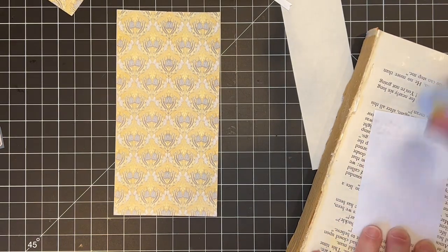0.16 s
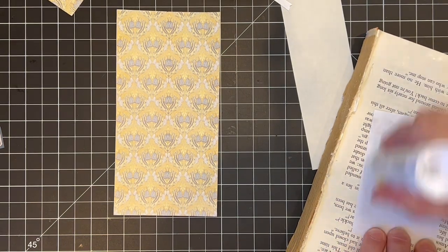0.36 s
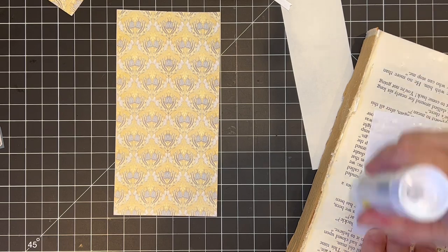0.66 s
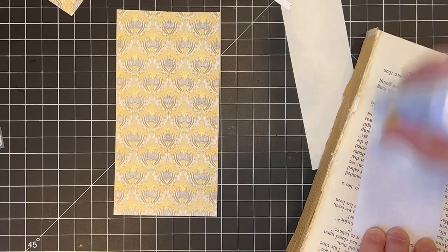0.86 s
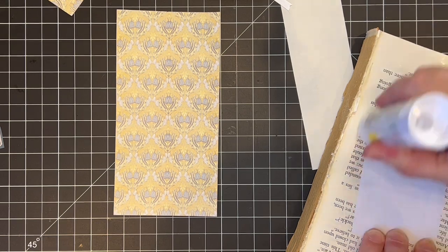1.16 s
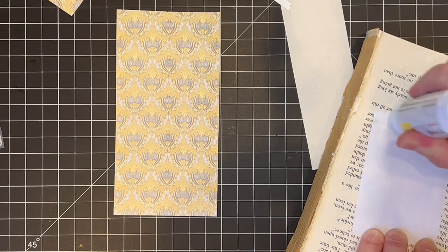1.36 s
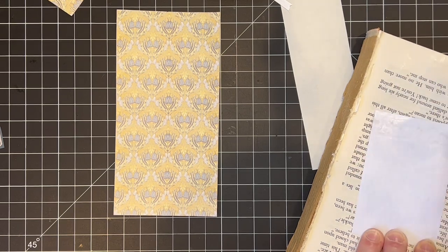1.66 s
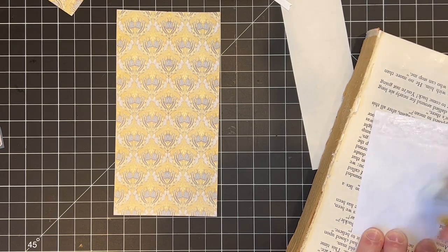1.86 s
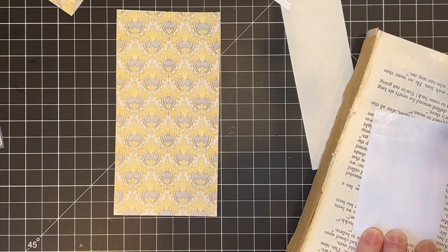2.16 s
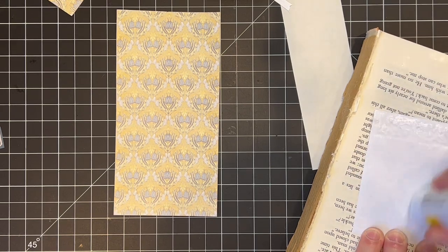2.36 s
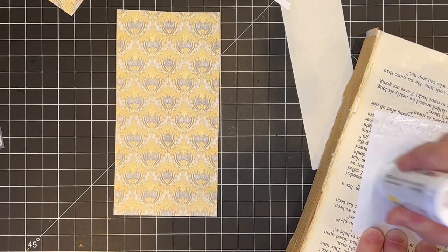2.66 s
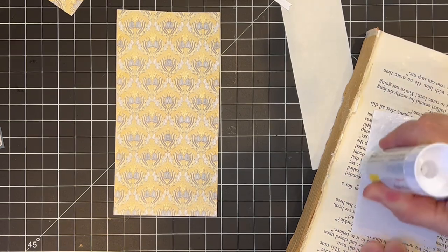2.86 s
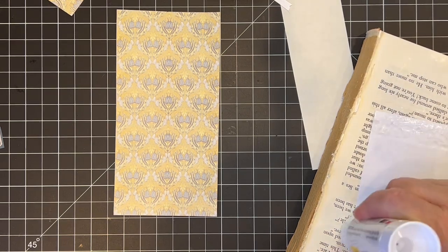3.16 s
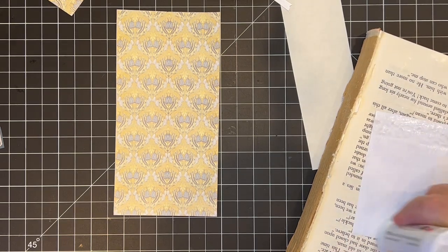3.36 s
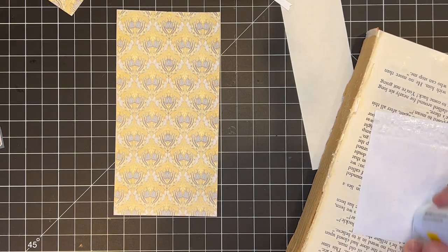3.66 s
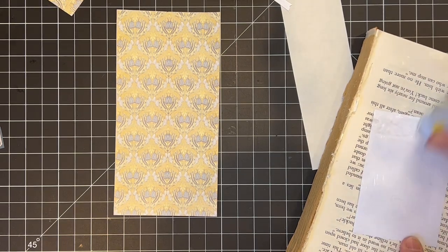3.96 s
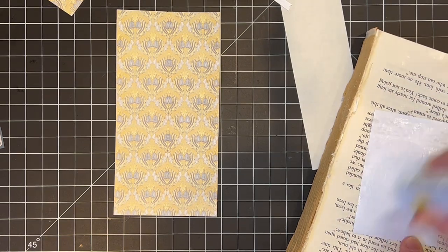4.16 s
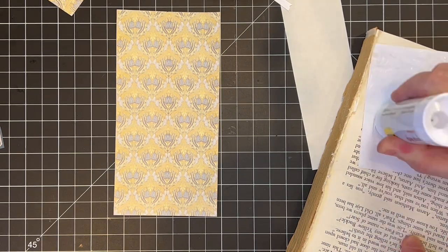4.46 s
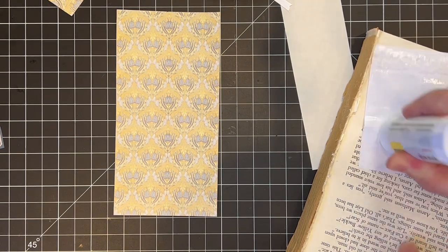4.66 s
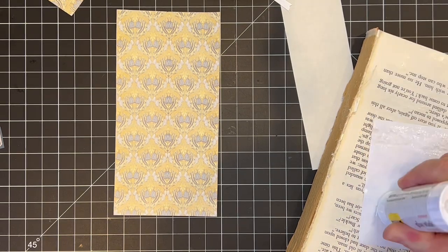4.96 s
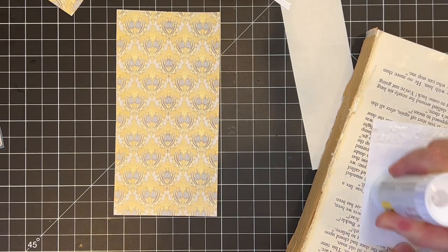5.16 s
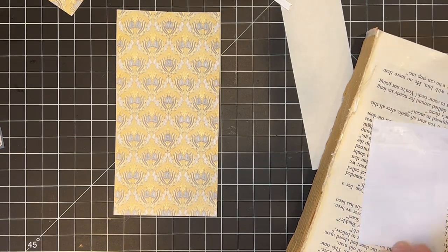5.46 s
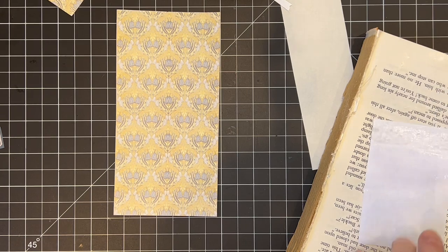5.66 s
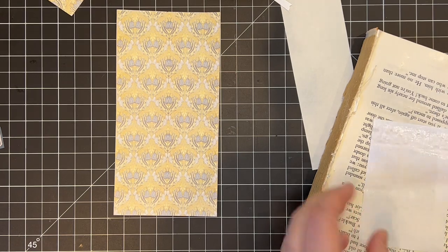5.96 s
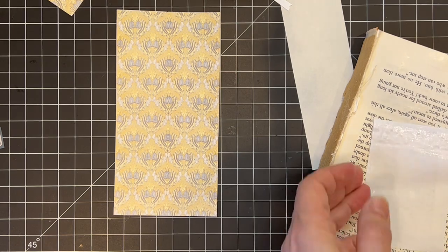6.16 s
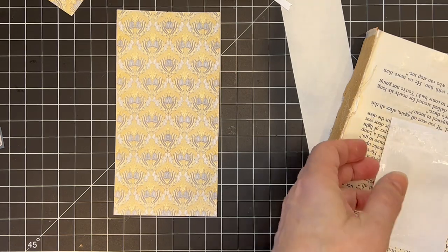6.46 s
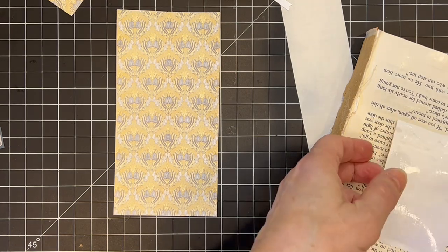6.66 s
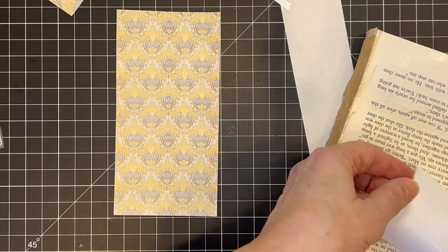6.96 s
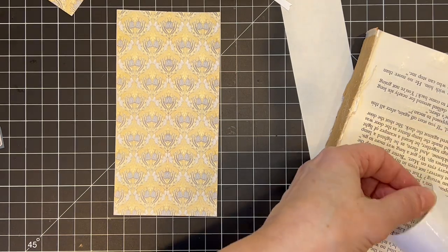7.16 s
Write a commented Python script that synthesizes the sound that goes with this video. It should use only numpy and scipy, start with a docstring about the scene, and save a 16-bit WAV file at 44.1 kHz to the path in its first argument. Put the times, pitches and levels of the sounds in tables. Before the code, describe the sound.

A small quiet room with faint hush and a low table murmur, heard very close through the table top. At 0 seconds a glue stick strikes paper on a book with a hard slap, hollow knock and plastic clack. More firm knocks follow at about 0.3, 0.6 and 1.0, the later two with sharp clicks just behind. From 1.3 to 2.3 the dabs are softer and sparser, with thin paper hiss; dull thuds return at 1.9, 2.3 and 2.7. Around 3 to 4 it is mostly faint ticks and light sliding. Between 4.25 and 4.9 come quick tacky snaps, dry scrapes and plastic clicks, then a low knock at 4.9. Smaller ticks continue until the stick is set down near 6.0 with a clear clack. Soft rustling follows as the sheet peels off, strongest near 6.8, fading to small ticks by 7.2.

```python
"""At a table in a small quiet room, a phone clamped to the same table top looks down on a sheet on an open book.
A glue stick is dabbed and dragged over it. Each dab is a set of table modes, delayed more the lower they are;
the barrel clacks as decaying sines, tacky glue and paper tick as noise bursts and hiss as grains over noise,
through the resonances of the sheet, which is peeled off at the end. The table murmurs as filtered noise,
the room answers with a diffuse tail and adds its hush, and left and right differ in phase."""
import sys
import numpy as np
from scipy import signal
from scipy.fft import rfft, irfft, next_fast_len
from scipy.io import wavfile
from scipy.ndimage import uniform_filter1d

SR = 44100
rng = np.random.default_rng(int(sys.argv[2]) if len(sys.argv) > 2 else 0)


def store_pcm(level_fs):
    """Save levels as 16-bit WAV."""
    pcm = np.round(np.clip(level_fs, -1, 1) * 32767).astype(np.int16)
    wavfile.write(sys.argv[1], SR, np.atleast_2d(pcm).T)


N = 322371

# Hush of the room. Each row: frequency in Hz, relative level per Hz in dB.
HUSH = [(15, -24), (25, -17.5), (53, 0.5), (85, -2.5), (324, -16), (527, -22), (706, -33), (1150, -34.5),
        (1580, -31), (2570, -41), (4290, -47), (7520, -44.5), (10000, -52.5), (12500, -36.5),
        (16000, -45.5)]
HUSH_DB = -65.5  # rms of the whole hush
# Murmur of the table. Each row: time in seconds, level at 40-140 Hz in dB, level at 140-700 Hz in dB.
MURMUR = [(0.0, -58.5, -67.5), (0.35, -60.5, -64.5), (0.51, -59.5, -67), (1.0, -52.5, -69),
          (1.81, -63.5, -74), (2.58, -56.5, -65), (3.48, -64, -70), (4.78, -62.5, -68.5),
          (4.95, -52.5, -74), (5.29, -59.5, -74.5), (6.29, -60, -63.5), (7.15, -70.5, -74),
          (7.31, -70.5, -72)]
# Modes of the table top. Each row: frequency in Hz, relative level in dB, 60 dB decay in seconds.
TABLE_MODES = [(63.85, 5.5, 1), (89, 2, 0.25), (103.6, -0.5, 0.1), (128, -11.5, 0.21), (178.9, -2, 0.27),
               (236.8, -3, 0.077), (314.8, -8.5, 0.098), (362, -10.5, 0.44), (438, -15.5, 0.32),
               (480, -20, 0.28), (528.7, -18, 0.22), (615, -24, 0.23), (750, -27, 0.12), (929, -30, 0.28)]
# Stick landing on the book, and at about 6 s set down on the table. Each row: start in seconds,
# slap peak (600-1300 Hz) in dB, knock peak in dB, knock frequency in Hz,
# body peak (130-260 Hz) in dB, thump peak (50-130 Hz) in dB.
DABS = [(0.019, -26, -19.5, 330, -35.5, -33.5), (0.289, -36.5, -18.5, 287, -22.5, -25),
        (0.475, -48, -37.5, 338, -45.5, -51), (0.622, -33, -14.5, 415, -21, -24),
        (0.987, -30.5, -15.5, 418, -21.5, -26), (1.292, -55.5, -51, 463, -54.5, -47.5),
        (1.667, -58, -51.5, 308, -38.5, -44), (1.922, -54, -29, 420, -32, -29),
        (2.093, -67, -50, 328, -56, -44.5), (2.336, -34, -35, 345, -20, -23.5),
        (2.682, -46, -31, 307, -29, -33.5), (2.849, -43.5, -41.5, 304, -39, -39.5),
        (3.096, -52, -47.5, 350, -48, -49), (3.991, -73, -48, 366, -51, -57.5),
        (4.253, -35, -26, 390, -51.5, -32), (4.388, -53, -43.5, 310, -58, -52.5),
        (4.44, -47, -42, 370, -52, -48.5), (4.669, -53.5, -40.5, 404, -43, -47),
        (4.689, -44, -37, 550, -46, -48.5), (4.938, -53, -29, 408, -27.5, -29.5),
        (5.374, -57, -42, 330, -58, -53), (5.56, -56, -49, 354, -47, -47), (6.017, -59, -44, 320, -34, -52),
        (6.03, -59, -44, 400, -38, -44), (6.14, -62, -44.5, 377, -47, -60)]
# Glue letting go, paper snapping. Each row: time in seconds, peak at 1.3-4 kHz in dB,
# brightness (9-16 kHz over that) in dB.
TICKS = [(0.0202, -17, -10.5), (0.29, -33.5, -4), (0.314, -48, -19), (0.332, -74, 30), (0.4138, -63.5, 18),
         (0.435, -59, 13.5), (0.624, -38, -9), (0.638, -59, 11), (0.653, -26.5, -10.5), (0.732, -57, 21.5),
         (0.7681, -65, 8), (0.9892, -52, 0), (1, -47.5, 8.5), (1.0208, -25, -5.5), (1.1683, -55.5, 13.5),
         (1.2943, -45.5, -6), (1.3285, -76, 28), (1.388, -67.5, 12), (1.4202, -57, 0.5),
         (1.4646, -72, 16.5), (1.6671, -44.5, 9.5), (1.9236, -40.5, -1.5), (1.947, -42.5, -15),
         (2.3387, -36.5, -11), (2.3755, -55, 10), (2.6804, -47, -8), (2.762, -78, 29), (2.801, -59.5, 12),
         (2.8294, -74, 15), (2.8468, -37.5, 0), (2.8672, -46, -1), (3.0976, -61.5, 10), (3.211, -65.5, 17),
         (3.245, -60, 19), (3.5039, -37.5, 3), (3.5822, -53.5, 0), (3.7037, -53, -3), (3.9342, -52.5, 8),
         (3.9673, -62, 22), (3.9812, -56, 4), (3.9945, -36.5, 12.5), (4.041, -43, -23), (4.05, -46.5, -23),
         (4.0655, -50, -12), (4.2444, -45.5, -17), (4.254, -37, -13), (4.3607, -39, -5), (4.385, -28, 3),
         (4.4034, -25, -23), (4.44, -31.5, 6), (4.5245, -58, 25.5), (4.65, -77, 22), (4.6591, -42.5, 16),
         (4.6667, -29.5, 7), (4.67, -36.5, 18), (4.6877, -37.5, -8), (4.785, -48, -22), (4.8272, -45.5, 10),
         (4.9404, -37, -7.5), (5.046, -60.5, -12), (5.3692, -62, 23.5), (5.3837, -54.5, 22.5),
         (5.4003, -54, 19), (5.4555, -58, 13), (5.5445, -67, 14), (5.602, -58, 10), (5.646, -56.5, -6),
         (5.9008, -58, 10), (5.9711, -44, -12), (6.018, -35.5, -1.5), (6.337, -43.5, 3.5),
         (6.998, -48, 4.5), (7.2346, -49, -16), (7.2407, -51.5, -12)]
# Resonances of the sheet. Each row: frequency in Hz, width in Hz, relative level in dB.
SHEET_MODES = [(1740, 1400, 2.5), (2636, 1200, 3.5), (3760, 1770, -11.5), (4463, 2700, -1),
               (7730, 1900, 3.5), (9600, 3600, -0.5), (12440, 4700, 3.5), (15200, 4800, 1)]
# the sheet in three registers: 1.3-4, 4-9 and 9-16 kHz
REGISTERS = [SHEET_MODES[:3], SHEET_MODES[3:5], SHEET_MODES[5:]]
# Clacks of the plastic barrel. Each row: time in seconds, peak in dB.
CLACKS = [(0.0203, -18), (0.652, -26), (1.0209, -25.5), (4.388, -27.5), (4.4038, -25), (6.018, -17.5)]
# Modes of the barrel. Each row: frequency in Hz, relative level in dB, 60 dB decay in seconds.
BARREL_MODES = [(1290, -11.5, .02), (2300, -1.5, 0.023), (2690, 4.5, 0.016), (3170, -5, .012),
                (3680, -9, 0.0083)]
# Tail of the room. Each row: band centre in Hz, 60 dB decay in seconds, level in dB.
ROOM_BANDS = [(1226, 0.39, -21), (2770, 0.083, -24.5), (6500, 0.24, -14), (12500, 0.074, -26)]
# Hiss of sliding on paper, and hiss trailing dabs and the set-down stick. Each row: time of full level
# in seconds, hold in milliseconds, level at 1.3-4 kHz in dB, brightness (9-16 kHz over that) in dB.
STROKES = [(0.144, 64, -86, 5), (0.312, 165, -69, -5), (0.419, 27, -68, 5), (0.631, 19, -76, 11),
           (0.733, 50, -70, 7), (0.997, 7, -57, -1), (1.04, 71, -71, -2), (1.125, 104, -80, 4.5),
           (1.293, 49, -75.5, 1), (1.525, 79, -81.5, -1.5), (1.678, 34, -72.5, 1), (1.936, 18, -66, -12),
           (2.047, 67, -72.5, -6.5), (2.351, 51, -73, -3), (2.431, 69, -71, -12.5), (2.69, 46, -85, 9),
           (2.77, 52, -89, 18), (2.829, 33, -66, 3), (2.864, 101, -69.5, 3), (3.084, 117, -76, 5),
           (3.248, 35, -76, 1.5), (3.359, 7, -78.5, 7), (3.5, 43, -67, -8), (3.938, 34, -74, -9),
           (3.997, 27, -59.5, -26), (4.255, 5.8, -65, -4.5), (4.366, 22, -50.5, 2), (4.393, 39, -46, 5),
           (4.47, 21, -66, -15), (4.519, 7.3, -56, -13), (4.668, 28, -54.5, 4), (4.699, 29, -50.5, -2),
           (4.741, 36, -56.5, 2), (4.824, 23, -57.5, -10), (4.891, 52, -67.5, -1), (5.044, 11, -77, -2),
           (5.376, 15, -60, 5), (5.463, 4.5, -65, -5), (5.545, 9.7, -62, 3), (5.7, 35, -67, 0),
           (5.748, 72, -75, 5), (5.868, 31, -79.5, 8), (5.991, 32, -64, -8), (6.039, 72, -52.5, -19),
           (6.138, 28, -63, -17), (6.239, 120, -73, -11), (6.31, 29, -67, 5.5), (6.36, 105, -71, 4),
           (6.531, 120, -74.5, -6), (6.68, 240, -73.5, -6.5), (6.79, 38, -58, -3), (6.865, 60, -56, -4),
           (6.961, 77, -64, -2), (7.041, 60, -70, 0.5), (7.234, 11, -73.5, -17)]
# Phase between left and right. Each row: frequency in Hz, lead of the left in radians.
STEREO_PHASE = [(0, 0), (900, -.5), (1700, 0), (3000, .5), (4000, .1), (7500, 0), (8800, -1.4),
                (9400, -3.1), (10700, -3.2), (11600, -4.8), (12600, -6.2), (13600, -6.3), (14600, -7.2),
                (15400, -9.3), (22050, -9.4)]
# Sound of opposite sign left and right. Each row: frequency in Hz, level in dB.
STEREO_UNLIKE = [(60, -29), (300, -25), (600, -20), (900, -13), (2000, -24), (6000, -18), (8800, -10),
                 (10000, -24), (11700, -11), (13200, -24), (15000, -8)]
# Level between left and right. Each row: frequency in Hz, left minus right in dB.
STEREO_LEVEL = [(100, 1.2), (1000, .5), (3000, -.2)]

BASS_LAG_MS = 16  # from the contact to the bass of a dab, at 100 Hz
# stir left by a dab in the low and the upper modes, over its thump
STIR_DB, UPPER_STIR_DB, STIR_T60_S = -13.5, -14.5, 0.37
MIDDLE_SHARE = 0.72  # part of the brightness that reaches 4-9 kHz
TICK_MIDDLE_DB, STROKE_MIDDLE_DB = -6.5, -3.5  # 4-9 kHz offset
FAINT_TICK_DB, FAINT_SCATTER_DB = 3, 7.5  # faint ticks over the hiss they fall in
SWELL_MS, SWELL_PER_HOLD, SAG_DB = 18.3, 0.21, -7  # longer holds swell for longer; sag over the hold
SHEET_OFF_S = 6.7  # from here the sheet is held in the air
TOP_HZ = 16400


def amp(db):
    """Gain of a level in dB."""
    return 10 ** (np.asarray(db) / 20)


def unit(x):
    """Scaled to rms 1."""
    return x / np.sqrt(np.mean(x ** 2))


def on_log(table, hz):
    """A (Hz, value) table read on a log axis."""
    table_hz, values = np.transpose(table)
    return np.interp(np.log(hz + 1), np.log(table_hz), values)


def curves(table):
    """The columns of a time table, one value a sample."""
    s, *columns = np.transpose(table)
    return [np.interp(np.arange(N) / SR, s, column) for column in columns]


def bump(f, hz, width):
    """Response of one resonance, gain 1 at its centre."""
    return 1j * f * width / (hz ** 2 - f ** 2 + 1j * f * width)


def colour(x, response):
    """Filter by a function of frequency."""
    size = next_fast_len(x.shape[-1] + 8192)
    f = np.arange(size // 2 + 1) * SR / size
    return irfft(rfft(x, size) * response(f), size)[..., :x.shape[-1]]


def add(out, s, x):
    """Mix x into out from s seconds."""
    i = int(s * SR)
    out[i:i + len(x)] += x[:len(out) - i]


def walk(rate):
    """Random levels held 1 / rate s and slewed; spread 1."""
    k = int(SR / rate)
    steps = np.repeat(rng.standard_normal(N // k + 1), k)
    return unit(uniform_filter1d(steps, k)[:N])


def sheet(f, modes):
    """Resonances of the sheet, each applied twice for steep skirts; alternate signs leave no notch between."""
    return sum((-1) ** k * amp(db) * bump(f, hz, width) ** 2 for k, (hz, width, db) in enumerate(modes))


def registers(db, bright_db, middle_db):
    """Levels of the three registers of the sheet from one level and one brightness."""
    return np.array([db, db + middle_db + MIDDLE_SHARE * bright_db, db + bright_db])


def air():
    """The steady hush of the room: noise shaped over frequency."""
    return amp(HUSH_DB) * unit(colour(rng.standard_normal(N), lambda f: amp(on_log(HUSH, f))))


def lean(flicker_db=2.0):
    """Small steady pushes keep the table modes murmuring, more so just after a dab."""
    def murmur(modes):
        """Noise through broadened table modes."""
        def response(f):
            return sum(amp(db) * bump(f, hz, 0.17 * hz) ** 2 for hz, db, _ in modes)
        return unit(colour(rng.standard_normal(N), response))

    t = np.arange(N) / SR
    stir = np.zeros(N)  # power
    for s, *_, thump_db in DABS:
        fading = amp(2 * (thump_db - 60 * np.abs(t - s) / STIR_T60_S))
        stir += (t > s + BASS_LAG_MS / 1000) * fading
    low_db, high_db = curves(MURMUR)
    low = np.sqrt(amp(2 * low_db) + amp(2 * STIR_DB) * stir)
    high = np.sqrt(amp(2 * high_db) + amp(2 * UPPER_STIR_DB) * stir)
    low_murmur = low * murmur(TABLE_MODES[:4])
    return low_murmur + high * amp(flicker_db * walk(42)) * murmur(TABLE_MODES[4:])


def dabs(ring_db=14, spread=1.3, scatter_db=3.5, detune=.06, knock_width=0.82, echo_db=-6, rise_ms=7):
    """Bending waves run to the phone, slower the lower they are, and leave the table top ringing."""
    size = 32768
    out, f = np.zeros(N), np.arange(size // 2 + 1) * SR / size
    chance = rng.standard_normal((len(DABS), len(TABLE_MODES), 2))
    echoes_s = rng.uniform(.005, 0.036, (len(DABS), 3))
    # travel delay: at 100 Hz the bass lag less the time the bass takes to build up, shorter higher up
    delay_s = (BASS_LAG_MS - rise_ms) / 1000 * (140 / (f + 40)) ** spread
    turn = 2 * np.pi * np.cumsum(delay_s) * SR / size  # the phase that gives this delay
    for (s, slap_db, knock_db, knock_hz, body_db, thump_db), luck, edges in zip(DABS, chance, echoes_s):
        # every blow draws its own slight detuning and level for each mode
        ring = 0
        for (hz, db, t60), (u, v) in zip(TABLE_MODES, luck):
            width = np.log(1000) / np.pi / t60
            ring = ring + amp(db + scatter_db * u) * bump(f, hz * (1 + detune * v), width)
        # the wave comes back from the table edges, weaker the later, and breaks up the glide
        back = sum((-1) ** k * amp(echo_db - 730 * lag) * np.exp(-2j * np.pi * f * lag)
                   for k, lag in enumerate(edges))
        wave = (1 + back + amp(ring_db) * ring) * np.exp(-1j * turn)
        thump, body = (85, 95, thump_db), (200, 200, body_db)
        knock, slap = (knock_hz, knock_width * knock_hz, knock_db), (800, 600, slap_db)
        for hz, width, db in (thump, body, knock, slap):
            part = irfft(wave * bump(f, hz, width) ** 3, size)[:size * 3 // 4]
            add(out, s - .0005, part * amp(db) / np.abs(part).max())
    return out


def ticks(burst_ms=1.4, rattle=0.4, snap_share=0.53):
    """A sharp snap with a very short rattle behind it, in each register of the sheet."""
    ms, out = np.arange(512) * 1000 / SR, np.zeros(N)
    # every stretch of hiss also carries one faint tick somewhere along its hold
    places, scatter = rng.random(len(STROKES)), rng.standard_normal(len(STROKES))
    faint = [(s + hold_ms / 1000 * u, db + FAINT_TICK_DB + FAINT_SCATTER_DB * v, bright_db)
             for (s, hold_ms, db, bright_db), u, v in zip(STROKES, places, scatter)]
    every = TICKS + faint
    cracks = rattle * rng.standard_normal((len(every), 3, len(ms))) * np.exp(-ms / burst_ms)
    cracks[:, :, 0] += snap_share
    for (s, peak_db, bright_db), crack in zip(every, cracks):
        levels_db = registers(peak_db, bright_db, TICK_MIDDLE_DB)
        for modes, db, snap in zip(REGISTERS, levels_db, crack):
            part = colour(snap, lambda f: sheet(f, modes))
            add(out, s - .0006, part * amp(db) / np.abs(part).max())
    return out


def clacks(detune=0.025, scatter_db=4.0):
    """A hard contact rings the short modes of the barrel."""
    t, out = np.arange(4096) / SR, np.zeros(N)
    chance = rng.standard_normal((len(CLACKS), len(BARREL_MODES), 2))
    for (s, peak_db), luck in zip(CLACKS, chance):
        ring = np.zeros(len(t))
        for (hz, db, t60), (u, v) in zip(BARREL_MODES, luck):
            decay = amp(db + scatter_db * u - 60 * t / t60)
            ring += decay * np.sin(2 * np.pi * hz * (1 + detune * v) * t)
        add(out, s - .0003, ring * amp(peak_db) / np.abs(ring).max())
    return out


def room(x):
    """A diffuse tail, fading band by band."""
    t = np.arange(SR // 2) / SR
    tail = np.zeros(len(t))
    for hz, t60, db in ROOM_BANDS:
        band = unit(colour(rng.standard_normal(len(t)), lambda f: bump(f, hz, hz) ** 2))
        # the root keeps the energy of the band the same for any decay time
        tail += amp(db) * band * np.sqrt(14 / t60 / SR) * amp(-60 * t / t60)
    return signal.fftconvolve(x, tail * (t > .004))[:N]


def slide(grains_per_s=2500, grain_db=1.5, hiss=0.94, patchy_db=3.0, flicker_db=2.0, lift_s=0.068, book_db=-3):
    """Dense tiny slips of uneven size over a hiss; each stretch swells, sags over its hold and fades."""
    t, power = np.arange(N) / SR, np.zeros((3, N))
    for full, hold_ms, db, bright_db in STROKES:
        start = full - (SWELL_MS + SWELL_PER_HOLD * hold_ms) / 1000
        end = full + hold_ms / 1000
        shape_db = np.interp(t, [start, full, end, end + lift_s], [-22, 0, SAG_DB, SAG_DB - 30],
                             left=-200, right=-200)
        levels_db = registers(db, bright_db, STROKE_MIDDLE_DB)
        power += amp(2 * levels_db)[:, None] * amp(2 * shape_db)
    slipping = rng.random(N) < grains_per_s / SR
    size_db = grain_db * np.minimum(rng.exponential(size=N), 4)
    slips = slipping * amp(size_db) * rng.standard_normal(N)
    grit = unit(slips) + hiss * rng.standard_normal(N)
    # half as patchy once the sheet is in the air
    grit *= amp(patchy_db * np.where(t < SHEET_OFF_S, 1, .5) * walk(130))
    # the drag also shakes the pages of the book underneath, as long as the sheet lies on it
    pages = unit(colour(grit, lambda f: bump(f, 422, 420) ** 2))
    out = amp(book_db) * (t < SHEET_OFF_S) * np.sqrt(power[0]) * pages
    for modes, p in zip(REGISTERS, power):
        out += np.sqrt(p) * amp(flicker_db * walk(90)) * unit(colour(grit, lambda f: sheet(f, modes)))
    return out


def scene():
    """Everything on the table, its room, and what differs between left and right."""
    near = dabs() + clacks() + ticks() + slide()
    both = near + room(near) + lean() + air()
    # a random decaying smear of the same sound, opposite in sign left and right, widens it
    smear = rng.standard_normal(8192) * np.exp(-np.arange(8192) / 1500)
    smeared = signal.fftconvolve(both, smear / np.linalg.norm(smear))[:N]
    unlike = colour(smeared, lambda f: amp(on_log(STEREO_UNLIKE, f)))
    return np.array([both + unlike, both - unlike])


def record(dry):
    """Left and right differ in phase and a little in level; the top is cut."""
    side = np.array([[.5], [-.5]])  # half of each difference to either side

    def response(f):
        phase = np.interp(f, *np.transpose(STEREO_PHASE))
        return amp(side * on_log(STEREO_LEVEL, f)) * np.exp(1j * side * phase)

    # silence ahead leaves space for the phase lead
    stereo = colour(np.pad(dry, ((0, 0), (64, 0))), response)[:, 64:]
    return signal.sosfilt(signal.ellip(8, .2, 70, TOP_HZ, fs=SR, output="sos"), stereo)


dry = scene()
out = record(dry)
store_pcm(out)
```